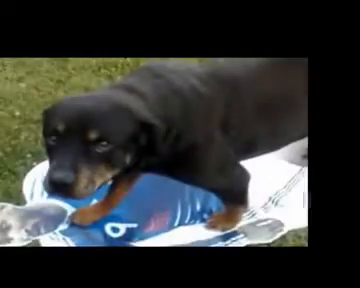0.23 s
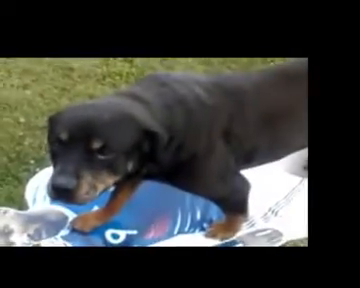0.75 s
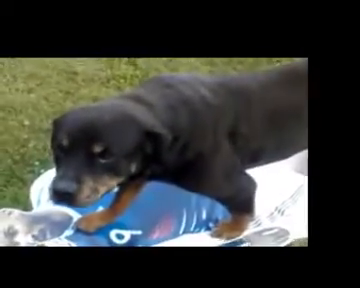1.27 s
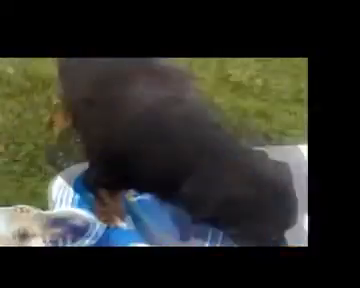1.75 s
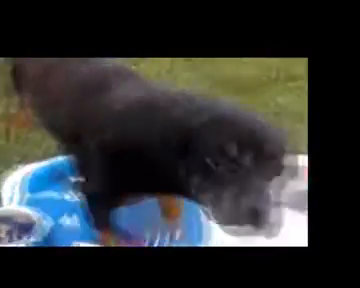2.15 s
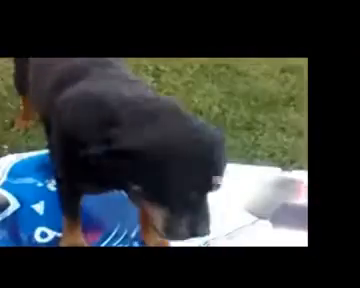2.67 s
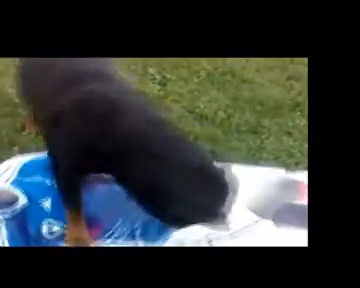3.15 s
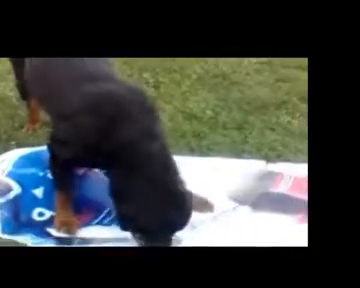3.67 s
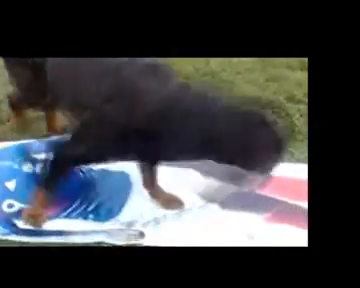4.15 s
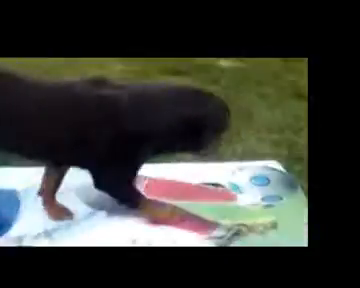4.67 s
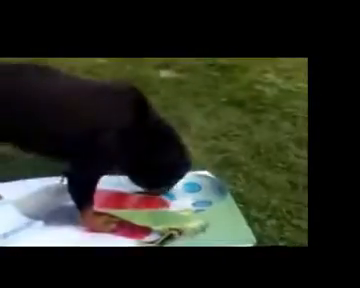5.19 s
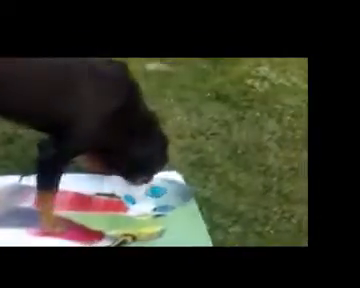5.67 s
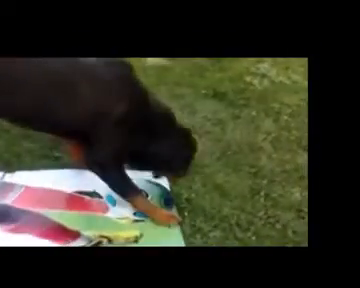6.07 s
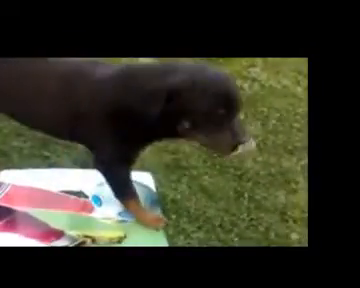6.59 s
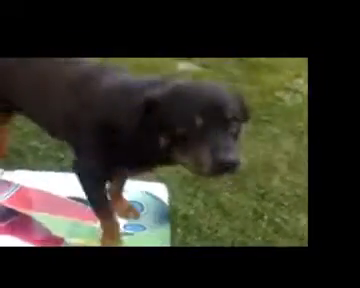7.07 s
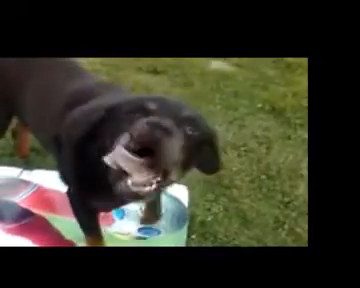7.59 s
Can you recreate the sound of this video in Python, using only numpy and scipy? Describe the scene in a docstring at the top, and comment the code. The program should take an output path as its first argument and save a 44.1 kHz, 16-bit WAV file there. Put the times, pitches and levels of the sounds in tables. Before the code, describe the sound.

A large dog very close to the microphone outdoors growls deep and raspy, snaps its jaws, then lunges with a hoarse roar that sinks into a throbbing moan and a short gruff bark. A second, shorter growl follows, then wet snaps and a slow throaty purr. After a pause comes a third growl, a long rattling snort, and a last growl. A dull echo trails each sound over very faint air.

```python
"""A large dog growls four times, close to the microphone, over faint outdoor air.
After the first growl its jaws snap; it lunges with a roar that ends in a moan, barks gruffly, and a thin
high ring follows. After the second growl come more snaps and a slow throaty purr; after the third, a long
rattling snort; then the last growl. Pulses from the vocal folds and noise from the breath ring through
chest, mouth and teeth; purr and snort are rows of single flaps. A dull echo trails each sound."""
import sys
import numpy as np
from scipy import signal
from scipy.fft import rfft, irfft, next_fast_len
from scipy.io import wavfile
from scipy.ndimage import uniform_filter1d, map_coordinates

SR = 44100
rng = np.random.default_rng(int(sys.argv[2]) if len(sys.argv) > 2 else 0)


def master(y):
    """Save y as 16-bit WAV."""
    cut = np.clip(np.atleast_2d(y).T, -1, 1)
    pcm = np.round(cut * 32767)  # scale
    wavfile.write(sys.argv[1], SR, pcm.astype(np.int16))


N = 345744

# how fast the voice builds up, in growls and in the moan
ONSET_DB_PER_S = 278


def gain_of(db):
    """Turns decibels into an amplitude factor."""
    return 10 ** (np.asarray(db) / 20)


def evened(x):
    """Scales a sound to rms 1."""
    return x / np.sqrt(np.mean(x ** 2) + 1e-20)


def steadied(x, size=3000):
    """Holds the rms near 1 over several pulses, keeping each pulse's own size."""
    window = np.hanning(size)
    energy = signal.fftconvolve(x ** 2, window, "same")
    weight = signal.fftconvolve(np.ones(len(x)), window, "same")
    return x / np.sqrt(abs(energy / weight) + 1e-20)


def read(points, hz):
    """Reads a table of (frequency, value) on a log-frequency axis."""
    f, value = np.transpose(points)
    return np.interp(np.log(hz + 1), np.log(f + 1), value)


def add(mix, s, sound):
    """Mixes a sound in at time s, in seconds."""
    part = mix[..., max(round(s * SR), 0):][..., :sound.shape[-1]]
    part += sound[..., :part.shape[-1]]


def faded(x, size=200):
    """Softens both ends over size samples."""
    at = np.arange(x.shape[-1])
    return x * np.minimum(np.minimum(at, at[::-1]) / size, 1)


def swell(t, centre_s, width_s):
    """A bell-shaped surge."""
    return np.exp(-.5 * ((t - centre_s) / width_s) ** 2)


def envelope_db(t, full_s, end_s, rise_db_per_s, fall_db_per_s):
    """Attack, hold and release, in dB below the top."""
    attack = -rise_db_per_s * np.maximum(full_s - t, 0)
    return attack - fall_db_per_s * np.maximum(t - end_s, 0)


def coloured(x, spectrum):
    """Boosts and cuts the frequencies of x as a spectrum table says."""
    size = next_fast_len(x.shape[-1] + 1024)
    gain = gain_of(read(spectrum, np.fft.rfftfreq(size, 1 / SR)))
    return irfft(rfft(x, size) * gain, size)[..., :x.shape[-1]]


def air(spectrum, count, apart=0.14):
    """Air noise: coloured noise, almost alike in both channels but less so toward the top."""
    # how the difference between the channels changes with pitch: frequency_hz, level_db
    spread = [(4000, -1), (8000, 2), (13000, 6.5)]
    mid, side = coloured(rng.standard_normal((2, count)), spectrum)
    side = apart * coloured(side, spread)
    return evened(np.array([mid + side, mid - side]))


def ring(x, modes, shift=1):
    """Resonances of a body or cavity; the factor shift moves all their frequencies."""
    out = 0
    clock = np.cumsum(shift * np.ones(len(x))) / SR
    for hz, width, db in modes:
        # turn the resonance down to 0 Hz, smooth there with a double pole, and turn back
        turn = np.exp(2j * np.pi * hz * clock)
        r = np.exp(-np.pi * width / SR)
        smooth = signal.lfilter([(1 - r) ** 2], [1, -2 * r, r * r], x / turn + 1e-18)
        out = out + gain_of(db) * (turn * smooth).real
    return out


def fine_colour(x, ring_s=.0025, share=.14):
    """Random short reflections give the sound a fine uneven colour."""
    t = np.arange(300) / SR
    reflections = share * rng.standard_normal(len(t)) * np.exp(-t / ring_s) * (t > .001)
    taps = (t == 0) + reflections
    return signal.fftconvolve(x, taps[None] / np.linalg.norm(taps), axes=1)[:, :x.shape[1]]


def outdoor_air():
    """Faint outdoor air: steady noise, mostly low."""
    # colour of the outdoor air: frequency_hz, level_db (relative)
    colour = [(25, 6), (170, 1), (350, -26), (750, -27), (1600, -28.5), (14000, -38)]
    return gain_of(-45.5) * air(colour, N, apart=0.13)


def echo(x, apart=0.098):
    """A dull, narrow tail of fading noise, in which each pitch dies at its own pace."""
    # time to fade by 60 dB: frequency_hz, t60_s
    fade_times = [(100, 3), (260, 2.5), (700, 1.63), (2000, 2.64), (8000, 1.74)]
    # loudness of the whole tail: frequency_hz, level_db
    tail_levels = [(70, -14), (190, -11.5), (700, -13), (2000, -22), (8000, -24.5)]
    hz, t, z = signal.stft(rng.standard_normal((2, 2 * SR)), SR, nperseg=512)
    t60 = read(fade_times, hz)[:, None]
    decay = gain_of(read(tail_levels, hz)[:, None] - 60 * t / t60)
    same_energy = np.sqrt(2 * np.log(1000) / (t60 * SR))  # long and short tails weigh the same
    z = z * decay * same_energy * np.minimum(t / 0.025, 1)
    tail = signal.istft(z, SR, nperseg=512)[1]
    mid, side = signal.fftconvolve(x.mean(0)[None], tail, axes=1)[:, :N]
    return np.array([mid + apart * side, mid - apart * side])


def thin_ring():
    """A few faint high tones swell and fade after the bark."""
    # the tones: pitch_hz, level_db (rms at the peak)
    tones = [(6218, -66), (8861, -60), (12344, -79)]
    t = np.arange(N) / SR
    chord = sum(np.sqrt(2) * gain_of(db) * np.sin(2 * np.pi * hz * t) for hz, db in tones)
    return swell(t, 2.36, 0.042) * chord


def snaps(decay_s=0.0075):
    """Wet clacks of the jaws and lips: short bursts of noise that die at once."""
    # the clacks: start_s, level_db (before the common cut below)
    clacks = [(0.977, -24), (1.001, -19.5), (1.09, -19), (1.1113, -6), (1.133, -4.5), (3.2528, -9.5),
              (3.2845, -17.5)]
    # their colour: frequency_hz, level_db (relative)
    colour = [(300, -3.5), (700, -15.5), (2000, -22), (6000, -23), (13500, -38.5)]
    out, t = np.zeros((2, N)), np.arange(2500) / SR
    for s, db in clacks:
        add(out, s, gain_of(db - 8.5) * np.exp(-t / decay_s) * air(colour, len(t)))
    return out


def purr(early_s=-0.01357):
    """The slack throat beats slowly: an early flap with a puff of air, then the main thump and puff."""
    # course of the purr: time_s, rate_beats_per_s, thump_db, air_db (levels before the factors below)
    course = [(3.619, 24.1, -29, -48), (3.72, 23.9, -20, -42), (4, 22, -20, -42), (4.2, 20.6, -21, -42),
              (4.33, 19.1, -24, -47), (4.41, 18.2, -34, -51)]
    # resonances of the throat: frequency_hz, width_hz, level_db (relative)
    throat = [(59.2, 16.6, 14.5), (159.3, 83, 8), (250.7, 110, -34), (536, 59, -4.5), (746, 76, -10),
              (1335, 293, -42)]
    # colour of the puffs: frequency_hz, level_db (relative)
    puff_colour = [(200, 0), (650, 25), (1000, 1), (1400, 19), (2250, -1), (3600, 5.5), (5600, 2.5),
                   (13000, -10.5)]
    out, t = np.zeros((2, N)), np.arange(-1400, 4000) / SR
    when, *columns = np.transpose(course)
    clock = np.arange(when[0], when[-1], 1 / SR)
    rate, thump_db, air_db = (np.interp(clock, when, c) for c in columns)
    beats = np.flatnonzero(np.diff(np.floor(np.cumsum(rate) / SR), prepend=-1))
    for k in beats:
        flaps = swell(t, 0, .00008) + 1.03 * swell(t, early_s, .00008)
        flutter = 0.013 * swell(t, -0.0023, 0.0062) * rng.standard_normal(len(t))
        body = -ring(flaps + flutter, throat)
        thump = 0.46 * body / abs(body).max() + 0.36 * swell(t, 0.0016, 0.0018)
        puff_shape = swell(t, -0.00093, 0.0032) + 0.51 * swell(t, early_s, 0.004)
        puff = puff_shape * air(puff_colour, len(t))
        add(out, clock[k] + t[0], gain_of(thump_db[k]) * thump + gain_of(air_db[k]) * puff)
    return out * gain_of([[-1.2], [1.2]])  # a little to the right


def slap(t):
    """The soft palate slaps shut and rings the throat; the peak is 1."""
    # resonances of the throat: frequency_hz, width_hz, level_db (relative)
    throat = [(235, 190, 3.5), (518, 186, 2), (767, 50, 4), (928, 83, -1.5), (1340, 390, -12),
              (1890, 1700, -15), (3410, 2800, -19.5)]
    click = swell(t, 0.000829, .00005)
    flutter = 0.046 * swell(t, 0.002, 0.022) * rng.standard_normal(len(t))
    sound = -ring(click + flutter, throat)
    return sound / abs(sound).max()


def snort():
    """Air rushes past the soft palate, which slaps shut and pushes out a low pressure pulse."""
    # speed of the palate: time_s, rate_flaps_per_s
    flap_rate = [(5.7229, 28.3), (5.914, 34.5), (6.206, 34), (6.555, 29), (6.746, 23.3), (6.94, 20)]
    # strength of the airflow: time_s, level_db
    airflow = [(5.72, -31), (5.92, -26), (6.35, -28.5), (6.7, -35.5), (6.93, -43)]
    # colour of the rushing air: frequency_hz, level_db (relative)
    rush_colour = [(70, 6), (150, 10.5), (260, 1.5), (400, -9.5), (540, -0.5), (650, -18), (780, -0.5),
                   (1050, -8.5), (1300, -8.5), (2200, -19.5), (3600, -11.5), (4600, -20), (5400, -17),
                   (13500, -42.5)]
    # a few extra, hard slaps: time_s, level_db
    hard_slaps = [(5.758, -20), (5.792, -12.5), (5.913, -9.5), (6.206, -16.5), (6.555, -19)]
    slap_over_flow_db, slap_scatter_db, push_size = 2.5, 4, 1.76
    out, t = np.zeros((2, N)), np.arange(-1400, 3000) / SR
    clock = np.arange(flap_rate[0][0], flap_rate[-1][0], 1 / SR)
    cycle = np.floor(np.cumsum(np.interp(clock, *np.transpose(flap_rate))) / SR)
    for s in clock[np.diff(cycle, prepend=-1) > 0]:
        rush_shape = swell(t, 0.00058, 0.0036) + 0.27 * swell(t, 0, 0.025)
        rush = rush_shape * air(rush_colour, len(t))
        push = swell(t, 0.0031, 0.0029) - .5 * swell(t, 0.0053, 0.0077)
        flow = gain_of(np.interp(s, *np.transpose(airflow)))
        scatter_db = slap_scatter_db * np.clip(rng.standard_normal(), -2, 2)
        force = gain_of(slap_over_flow_db + scatter_db)
        add(out, s + t[0], flow * (force * slap(t) + rush + push_size * push))
    for s, db in hard_slaps:
        add(out, s + t[0], gain_of(db) * slap(t))
    return fine_colour(out, ring_s=0.0037, share=0.035) * gain_of([[-.8], [.8]])  # a little to the right


def folds(rate, rough, jitter=.24, shimmer_db=0.0, alternate_db=-1.5):
    """Uneven closures of the vocal folds: pushes, their sharp edges, and the puff of air after each."""
    edge_scatter_db, puff_s = 4.3, .002  # puff_s: how fast a puff dies away
    count = len(rate)
    wander = evened(uniform_filter1d(rng.standard_normal(count), 450))
    cycle = np.floor(np.cumsum(rate * (1 + jitter * rough * wander)) / SR)
    size, sharpness = np.clip(rng.standard_normal((2, count)), -2, 2)
    pushes = np.diff(cycle, prepend=0) * gain_of(shimmer_db * size)
    # strong and weak closures take turns
    edges = pushes * gain_of(edge_scatter_db * sharpness + alternate_db * (-1) ** cycle)
    puffs = signal.lfilter([1], [1, -np.exp(-1 / (puff_s * SR))], edges)
    return evened(pushes), evened(edges), evened(puffs)


def roughened(pulses, puffs, share):
    """Blends clean pulses with turbulence that surges at each pulse."""
    share = np.clip(share, 0, 1)
    turbulence = evened((.5 + puffs) * rng.standard_normal(len(pulses)))
    return (1 - share) * pulses + share * turbulence


def spittle(count, grain_db=0.0, size=260):
    """Wet lips make the hiss sputter: a random gain, smoothed over size samples."""
    return gain_of(grain_db * evened(uniform_filter1d(rng.standard_normal(count), size)))


def sputtered(x, grain_db=2.0, drift_db=1.03, size=3500):
    """Each band of the hiss flickers with the spittle and drifts on its own."""
    # low, middle and high band: centre_hz, width_octaves
    hiss_bands = [(2800, .45), (5500, .4), (10000, .4)]
    count = x.shape[-1]
    length = next_fast_len(count + 1024)
    octave = np.log2(np.clip(np.fft.rfftfreq(length, 1 / SR), 1000, 16000))
    bands = np.array([swell(octave, np.log2(hz), width) for hz, width in hiss_bands])
    shares = bands / bands.sum(0)
    parts = irfft(rfft(x, length)[None] * shares[:, None], length)[..., :count]
    out = 0
    for part in parts:
        flicker = spittle(count, grain_db) * spittle(count, drift_db, size=size)
        out = out + part * evened(flicker)
    return out


def roar(throb_hz=20.4, throb_db=2.6, throb_peak_s=1.597):
    """A hoarse blast through wide jaws, which dies away in a throbbing moan."""
    # rows chest, mouth, rasp, hiss: full_s, hold_s, level_db, rise_db_per_s, fall_db_per_s
    blasts = [(1.152, 0.17, -8, 346, 88), (1.276, 0.019, -7.5, 83.5, 105), (1.144, 0.16, -22.5, 244, 84.5),
              (1.177, 0.082, -16, 225.5, 89.5)]
    # resonances of chest, mouth and rasp: frequency_hz, width_hz, level_db (relative)
    chest_modes = [(117, 57, -4), (260.6, 100, 2)]
    mouth_modes = [(506, 160, -1), (672, 130, -3), (825, 75, -8.5), (1085, 260, -10.5)]
    rasp_modes = [(1328, 200, 6.5), (1570, 230, 0.5), (2370, 280, -23), (2870, 690, -7)]
    # colour of the hiss: frequency_hz, level_db (relative)
    hiss_colour = [(2500, -6.5), (3500, -3.5), (6500, -4), (8500, -9), (13200, -20)]
    # the moan as it takes over, before its throb: chest_db, mouth_db, rasp_db
    moan_levels = [-19.5, -27.5, -40]
    start_s, attack_s, moan_start_s, moan_end_s, moan_fade_db_per_s = 1.105, 0.03, 1.5, 1.9, 16
    rate_hz, sag_hz_per_s, rough = 135, 35, .58
    t = np.arange(start_s, moan_end_s, 1 / SR)
    *blast_db, hiss_db = (db + envelope_db(t, s, s + hold, rise, fall)
                          for s, hold, db, rise, fall in blasts)
    moan_db = envelope_db(t, moan_start_s, moan_start_s, ONSET_DB_PER_S, moan_fade_db_per_s)
    moan_db = moan_db + throb_db * np.cos(2 * np.pi * throb_hz * (t - throb_peak_s))
    pushes, edges, puffs = folds(rate_hz - sag_hz_per_s * (t - t[0]), rough)
    drive = roughened(pushes, puffs, rough)
    voiced = 0
    for blast, db, modes in zip(blast_db, moan_levels, [chest_modes, mouth_modes, rasp_modes]):
        gain = np.hypot(gain_of(blast), gain_of(db + moan_db))
        voiced = voiced + gain * steadied(ring(drive, modes))
    sputter = steadied(spittle(len(t), grain_db=1.5))
    jet = sputtered(air(hiss_colour, len(t)), grain_db=2.0, drift_db=-1.7)
    hiss = gain_of(hiss_db) * sputter * jet
    return t[0], faded(voiced + hiss) * np.minimum((t - t[0]) / attack_s, 1) ** 2


def controls(row, curve):
    """The times of one outburst, the levels that follow from effort and roughness, and the voice's state."""
    # loud cracks of the voice in mouth and rasp: time_s, extra_db
    voice_cracks = [(.783, 6), (2.079, 3.5), (2.753, 7.5), (3.143, 6), (5.152, 4.5), (7.279, 6)]
    crack_decay_s = 0.015
    # rasp and air build up first and let go a little earlier; the chest joins late and fast
    chest_onset_db_per_s, release_db_per_s, chest_lag_s = 477, 330, 0.0091
    air_onset_db_per_s, air_release_db_per_s, air_lead_s = 209, 289, 0.0087
    # dB that each layer gains for one dB of effort
    chest_follows, mouth_follows, rasp_follows, hiss_follows = 0.55, 1.11, 1.1, 1
    # rougher folds lose boom and drive the mouth harder: dB per unit of roughness above the usual
    usual_rough, rough_chest_db, rough_mouth_db = 0.33, -14.5, 13.5
    # the push of the lungs is never steady: scatter of its random points and their spacing
    unsteady_db, unsteady_s = 0.83, 0.03456
    start, end, chest_db, mouth_db, rasp_db, hiss_db = row
    t = np.arange(max(start - .15, 0), end + .15, 1 / SR)
    when, *columns = np.transpose(curve)
    effort, rate, rough, gape, shift = (np.interp(t, when, c) for c in columns)
    points = rng.standard_normal(SR // 200)
    effort = effort + unsteady_db * np.interp((t - t[0]) / unsteady_s, np.arange(len(points)), points)
    boom = envelope_db(t, start + chest_lag_s, end, chest_onset_db_per_s, release_db_per_s)
    voice = envelope_db(t, start, end, ONSET_DB_PER_S, release_db_per_s)
    airflow = envelope_db(t, start - air_lead_s, end - air_lead_s, air_onset_db_per_s, air_release_db_per_s)
    crack = sum(db * (t >= s) * np.exp(-abs(t - s) / crack_decay_s) for s, db in voice_cracks)
    extra_rough = rough - usual_rough
    levels = [chest_db + boom + chest_follows * effort + rough_chest_db * extra_rough,
              mouth_db + voice + crack + mouth_follows * effort + rough_mouth_db * extra_rough,
              rasp_db + airflow + crack + rasp_follows * effort,
              hiss_db + airflow + hiss_follows * effort]
    return t, levels, (rate, rough, gape, shift)


def growl(row, curve, lowest_hz=50):
    """Slow fold pulses boom in the chest, ring in the mouth and rasp past the bared teeth."""
    # resonances: frequency_hz, width_hz, level_db (relative)
    chest_modes = [(81.7, 16.3, 1), (162.8, 67, 8), (236, 36, -14.5)]
    mouth_modes = [(361, 285, -12), (489, 118, -1), (704.2, 54.6, 2), (1004, 290, -29)]
    open_mouth_modes = [(586.5, 88, -3.5), (873, 145, -2.5), (1135, 280, -9)]
    rasp_modes = [(1302, 142, 6.2), (1638, 255, 0.35)]
    teeth_modes = [(1780, 330, -5), (2368, 300, -11), (2990, 270, -25)]
    # colour of the hiss: frequency_hz, level_db (relative)
    hiss_colour = [(2500, -2), (3200, -7.5), (3900, -11.5), (4800, -9.5), (6300, -7), (9000, -9),
                   (13200, -21.5)]
    # the pressure bump of each closure is fullest when the folds beat slowly: rate_pulses_per_s, size
    bump_sizes = [(62, 0.82), (92, 0.34)]
    # scatter of the closures that reaches the mouth; least turbulence in the rasp; slide of the hiss (0-1)
    mouth_scatter, rasp_noise, hiss_slide = 0.33, .24, .5
    t, (chest_db, mouth_db, rasp_db, hiss_db), (rate, rough, gape, shift) = controls(row, curve)
    pushes, edges, puffs = folds(rate, rough)

    flow = signal.lfilter(np.hanning(270), [1], pushes)  # each closure also radiates one smooth bump
    bump = np.interp(rate, *np.transpose(bump_sizes)) * evened(flow)
    tension = (rate / 77) ** 0.13 * (1 + 0.34 * (rough - .25))  # a slack, easy throat booms lower
    boom = evened(ring(roughened(pushes, puffs, rough + 0.27), chest_modes, tension))
    low_cut = signal.butter(2, lowest_hz, "high", fs=SR, output="sos")
    chest = signal.sosfiltfilt(low_cut, bump - boom)

    drive = roughened(evened(pushes + mouth_scatter * edges), puffs, rough + 0.32)
    mouth = ring(drive, mouth_modes, shift) + gape * ring(drive, open_mouth_modes, shift)

    rasp_drive = roughened(edges, puffs, rough + rasp_noise)
    rasp = ring(rasp_drive, rasp_modes, shift) + (0.1 + gape) * ring(rasp_drive, teeth_modes, shift)

    voiced = gain_of(chest_db - 1.0) * steadied(chest)
    voiced = voiced + gain_of(mouth_db - 1.5) * steadied(mouth) + gain_of(rasp_db) * steadied(rasp)

    # the colour of the hiss slides with the mouth resonances: the noise is read faster or slower
    jet = fine_colour(air(hiss_colour, 2 * len(t)))
    place = np.cumsum(shift ** hiss_slide)
    jet = np.array([map_coordinates(side, [place], order=3) for side in jet])
    hiss = steadied((1 + 0.23 * puffs) * spittle(len(t), grain_db=0.85)) * sputtered(jet)
    return t[0], faded(voiced + gain_of(hiss_db + 1.5) * hiss)


def scene():
    """The dog, its echo and the faint outdoor air."""
    # four growls, with the short bark second (levels before effort, roughness and trims):
    # start_s, end_s, chest_db, mouth_db, rasp_db, hiss_db
    outbursts = [(0, 0.951, -16.5, -21, -28, -32), (1.997, 2.074, -19, -21, -32, -42),
                 (2.76, 3.187, -16, -21, -28.5, -28.5), (4.708, 5.488, -15.5, -22, -30, -35),
                 (7.15, 7.84, -18, -23.5, -37, -37.5)]
    # the voice in each: time_s, effort_db, rate_pulses_per_s, roughness (0-1), gape of the lips (0-1),
    # shift (factor on the mouth resonances)
    first_growl = [(0, -1.5, 63, 0.35, 0.33, 1.025), (.26, 0.5, 75, 0.28, 0.4, 1.035),
                   (.52, 2, 86.4, 0.32, 0.36, 1.01), (.72, 3, 67.8, .35, 0.34, 1),
                   (.95, 1.5, 82.5, 0.47, 0.31, 1)]
    gruff_bark = [(1.99, 1.3, 96.15, 0.7, 1, 0.99), (2.044, 1.8, 96.3, 0.33, 1, .97),
                  (2.08, 0.12, 95.8, .6, 0.82, 0.99)]
    second_growl = [(2.75, -4.5, 67.86, 0.8, 1, 1.12), (2.85, 2.5, 90.18, .14, 0.72, .98),
                    (2.96, -0.5, 91.2, 0.17, 1, .99), (3.02, -3, 89.88, .5, 0.94, .98),
                    (3.156, 0.5, 88.36, 0.39, 0.57, 0.96)]
    third_growl = [(4.7, -5, 94.16, .36, 0.16, 1.013), (4.96, -3.5, 84.28, 0.21, 0, 1.04),
                   (5.1, 4, 69.95, 0.27, 0.07, 0.98), (5.23, 2.5, 64.06, 0.073, 0, .99),
                   (5.32, 1.5, 66.44, .24, 1, 1.02), (5.449, 2, 72.7, 0.24, 0.83, 1.02)]
    last_growl = [(7.19, 2.5, 76.9, 0.46, 0.77, 0.97), (7.42, 1, 63.32, 0.32, 0.22, 1.07),
                  (7.52, -0.5, 60.9, 0.35, 0.39, 1.07), (7.64, -6, 59.3, .3, 0.85, 1.24),
                  (7.8, 2.5, 76.4, .32, 0.36, 0.88)]
    dog = np.zeros((2, N))
    for row, curve in zip(outbursts, [first_growl, gruff_bark, second_growl, third_growl, last_growl]):
        add(dog, *growl(row, curve))
    add(dog, *roar())
    dog = dog * gain_of([[-.15], [.15]])  # a touch to the right
    dog = dog + purr() + snort() + snaps() + thin_ring()
    return dog + echo(dog) + outdoor_air()


def record(dry):
    """The microphone sheds the lowest rumble and rounds off the loudest peaks; then the top is cut."""
    # low cut of the left and right microphone: frequency_hz
    low_cuts = [26.4, 8.3]
    heard = np.array([signal.sosfilt(signal.butter(1, hz, "high", fs=SR, output="sos"), x)
                      for hz, x in zip(low_cuts, dry)])
    rounded = heard / (1 + heard ** 6) ** (1 / 6)
    top_cut = signal.firwin(255, 13700, window=("kaiser", 9), fs=SR)  # 13700 Hz
    return signal.oaconvolve(rounded, top_cut[None], "same", axes=1)


dry = scene()
out = record(dry)
master(out)
```